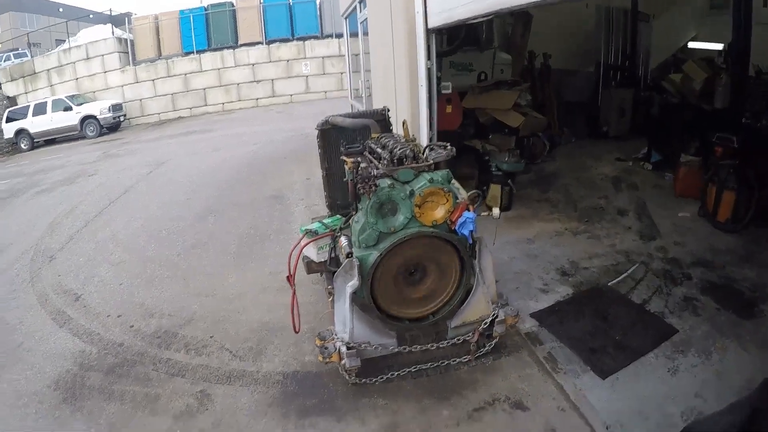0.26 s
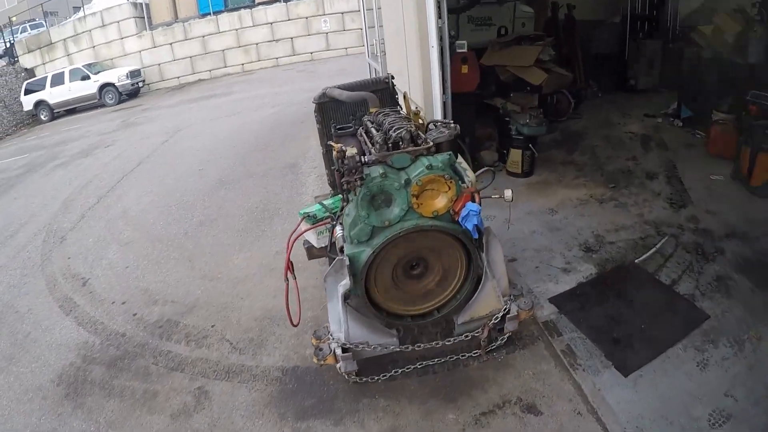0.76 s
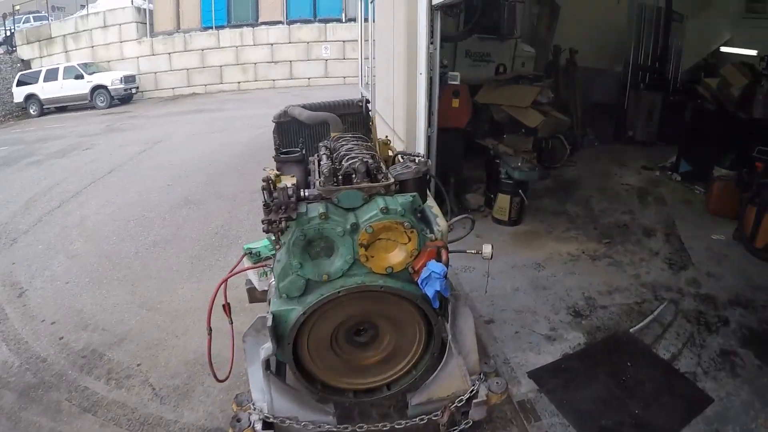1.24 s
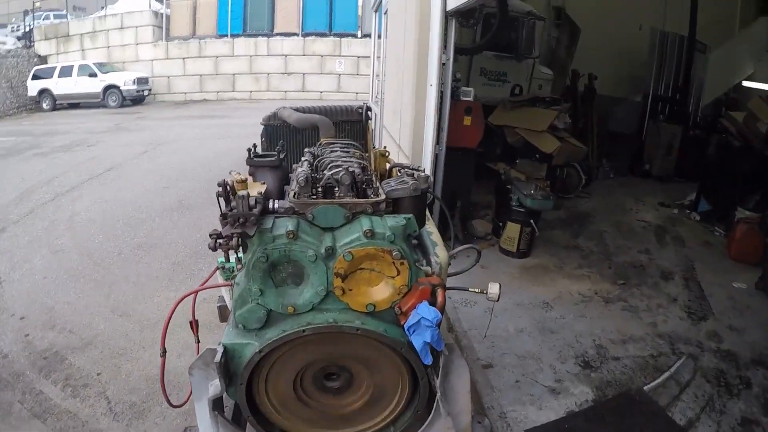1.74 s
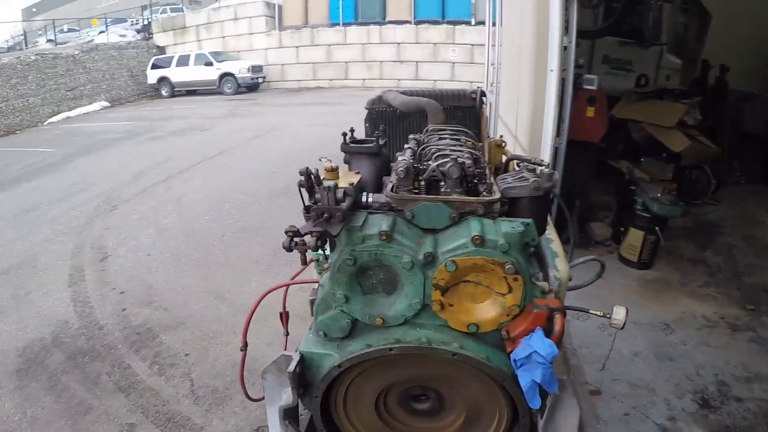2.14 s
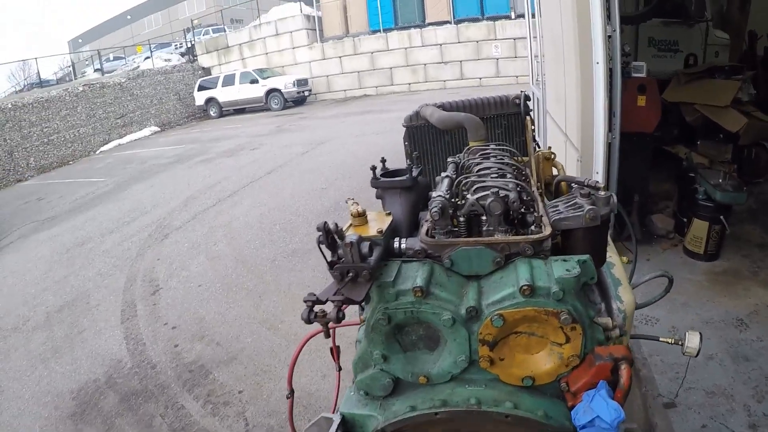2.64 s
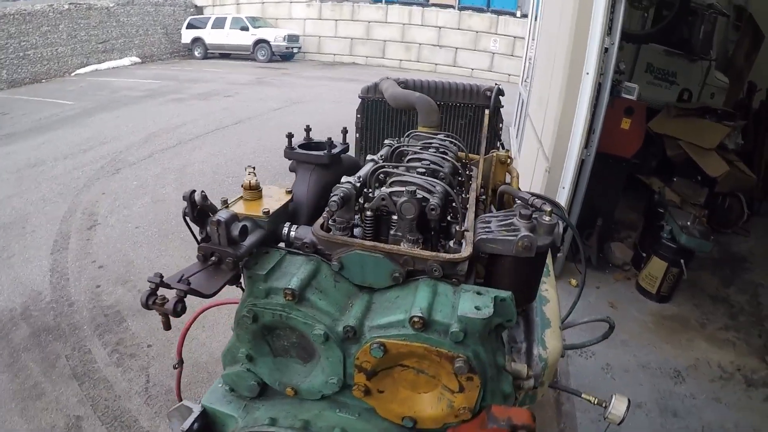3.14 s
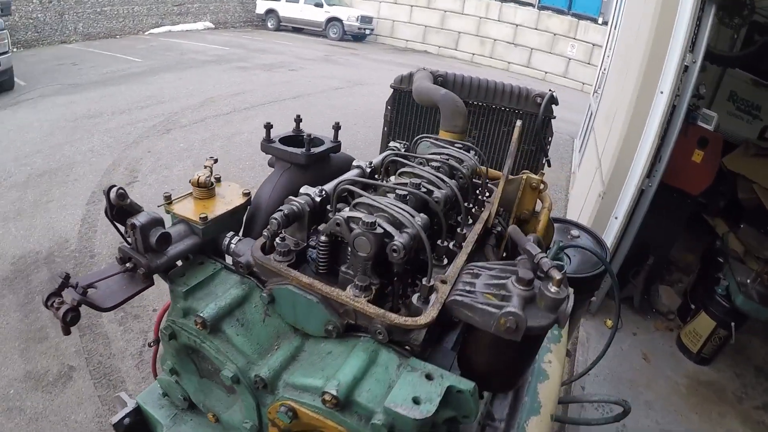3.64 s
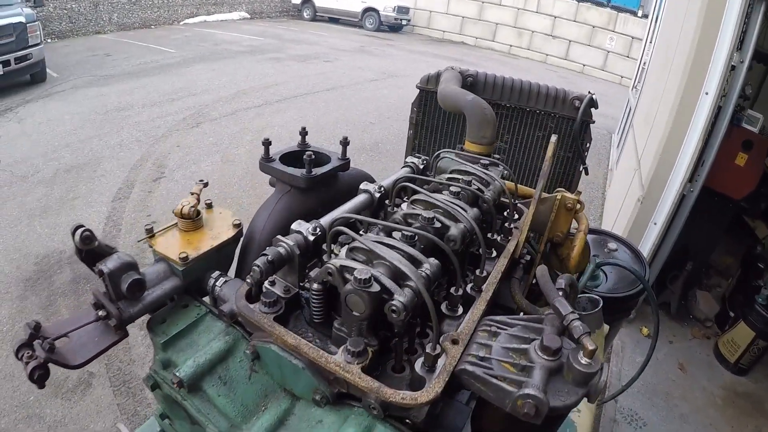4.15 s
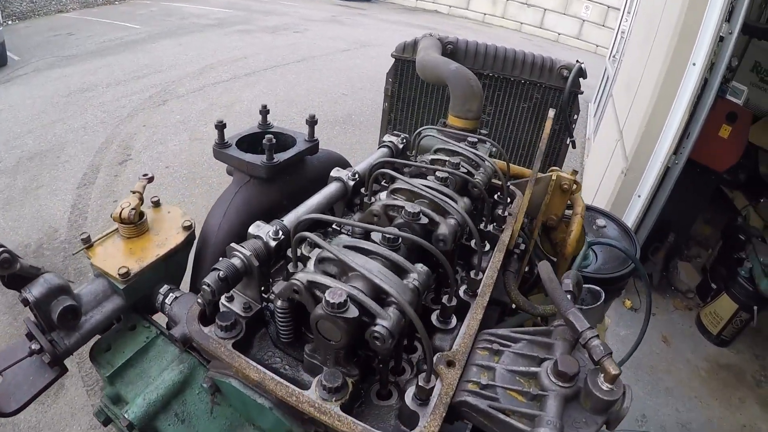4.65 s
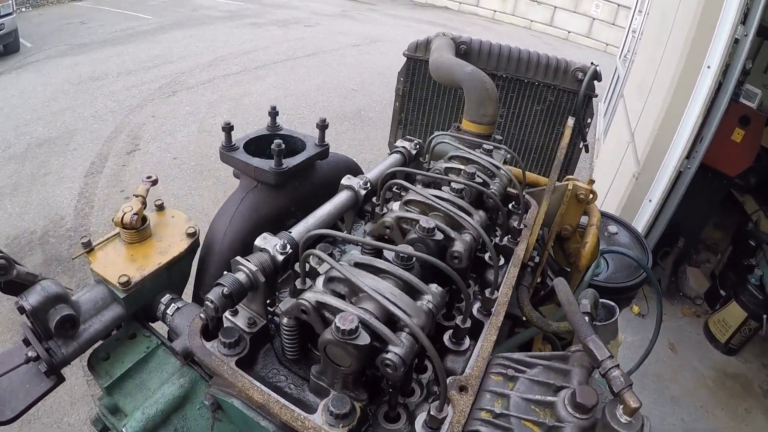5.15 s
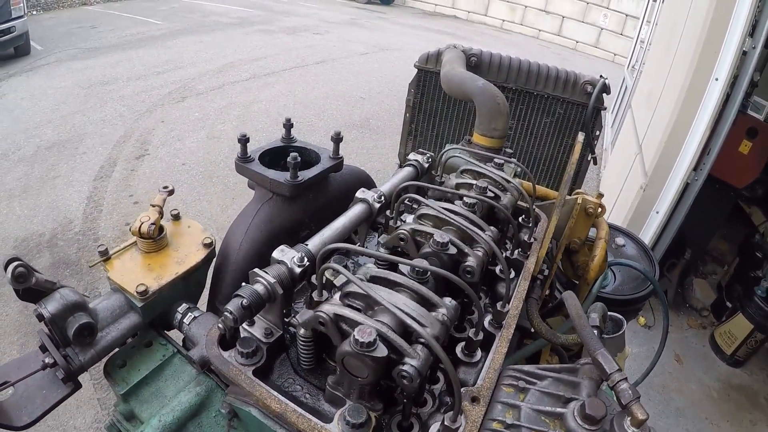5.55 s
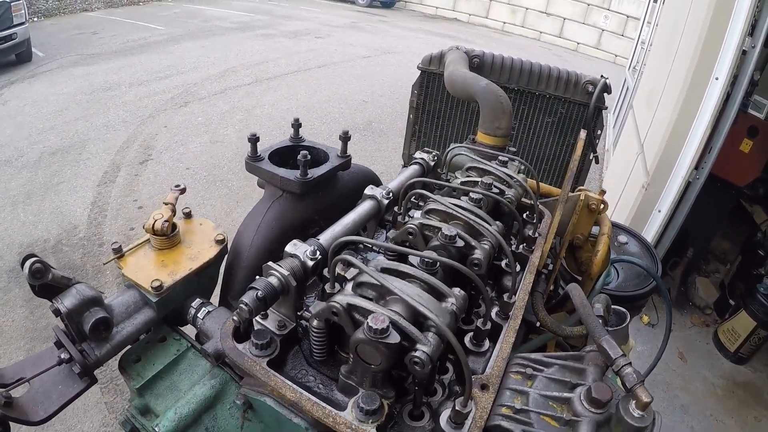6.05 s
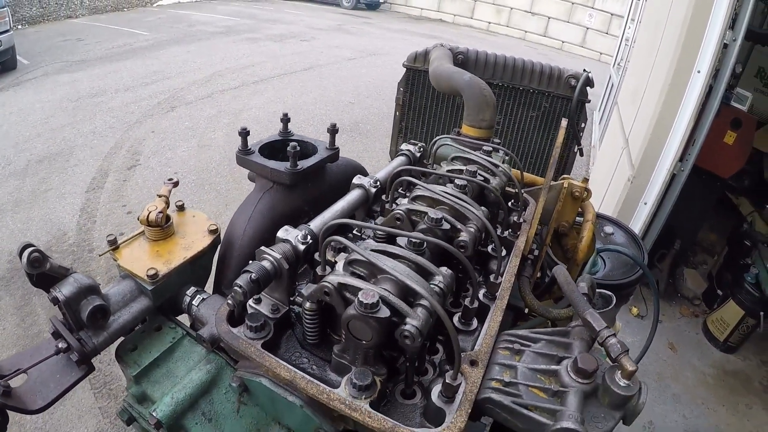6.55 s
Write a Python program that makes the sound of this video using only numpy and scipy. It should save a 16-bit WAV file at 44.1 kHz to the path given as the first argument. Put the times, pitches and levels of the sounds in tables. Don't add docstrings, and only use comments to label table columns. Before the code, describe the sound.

A bare two-stroke diesel is already idling at the start, about thirty blasts a second from an open exhaust stack. Valves snap, the block rings, rockers chatter and gas spits. A loose part clanks once per turn. The listener walks up over two seconds, then round to the stack side; slap from the shop front fades as direct sound takes over. Close small stereo microphones, slightly overloaded.

```python
import sys
import numpy as np
from scipy import signal
from scipy.fft import rfft, irfft
from scipy.io import wavfile
from scipy.ndimage import uniform_filter1d

SR = 44100
rng = np.random.default_rng(int(sys.argv[2]) if len(sys.argv) > 2 else 0)


def inscribe(sig):
    pcm = np.round(np.clip(np.atleast_2d(sig).T, -1, 1) * 32767)
    wavfile.write(sys.argv[1], SR, pcm.astype(np.int16))


def gain_from_db(level_db):
    decades = np.asarray(level_db, float) / 20
    return 10 ** decades


N = 299880
LEAD = SR // 5
TIME_S = np.arange(N) / SR


def band(x, hz, width):
    return signal.lfilter(*signal.iirpeak(hz, hz / abs(width), fs=SR), x)


def pole(x, hz, kind):
    b, a = signal.butter(N=1, Wn=hz, btype=kind, fs=SR)
    return signal.lfilter(b, a, signal.lfilter(b, a, x))


def clicks(s, size):
    at = np.clip(s * SR + LEAD, 0, N + LEAD)
    whole = at.astype(int)
    part = at - whole
    room = N + LEAD + 2
    first = np.bincount(whole, size * (1 - part), room)
    second = np.bincount(whole + 1, size * part, room)
    return (first + second)[:N + LEAD]


def puff(x, rise_ms, fall_ms):
    rise = np.exp(-1000 / (SR * max(rise_ms, .05)))
    fall = np.exp(-1000 / (SR * fall_ms))
    falling = signal.lfilter([1], [1, -fall], x)
    return signal.lfilter([1 - rise], [1, -rise], falling)[LEAD:]


def curve(table, s):
    return [np.interp(s, np.array(table)[:, 0], column) for column in np.array(table).T[1:]]


# time in seconds, way still to go (0 to 1),
# way round the housing to the stack side (0 to 1).
WALK = [
    (0, 0.7, 0.19),
    (.6, 0.59, 0),
    (1.2, 0.51, 0.27),
    (1.9, 0.03, 0),
    (2.6, 0.18, 0.1),
    (3.1, 0.04, 0.36),
    (3.6, 0, 0.68),
    (4.6, 0.1, 0.9),
    (6.8, 0.04, 1),
]


def heard(rule, s):
    far, side = curve(WALK, s)
    return rule[0] + rule[1] * far + rule[2] * side


def echoed(at, size, s):
    delay_ms = heard((2.14, 1.93, 0.056), s)
    echo_db = heard((-27.5, 32.5, -23), s)
    return clicks(at, size) + clicks(at + delay_ms / 1000, size * gain_from_db(echo_db))


# time in seconds, firings per second.
SPEED = [(0.0, 29.492), (0.23, 30.036), (0.88, 30.861), (1.28, 30.48), (1.77, 30.261), (2.19, 30.471),
         (3.04, 30.733), (3.36, 30.131), (3.7, 30.368), (3.9, 30.915), (4.38, 30.863), (4.55, 30.218),
         (5.3, 29.936), (5.73, 30.84), (6.16, 30.548), (6.8, 30.622)]


def firings():
    first_firing_s = .0273
    t = np.arange(-LEAD, N + LEAD) / SR
    done = np.cumsum(curve(SPEED, t)[0]) / SR
    done = done - np.interp(first_firing_s, t, done)
    number = np.arange(np.ceil(done[0]), done[-1])
    return np.interp(number, done, t), (number % 3).astype(int)


# pitch in Hz, likeness of left and right (0 to 1),
# left minus right in dB.
PORTS = [(60, 0.93, 29.5), (297, 1, 12), (670, 0.61, -3), (1310, 0, 1.5), (3550, 1, 0.7),
         (5330, 0.76, -1.5), (7560, 0.59, 2), (8700, 0.05, -10), (12000, 0.2, -5.5), (16000, 0.3, -7)]
# pitch in Hz, how far the left microphone leads in radians.
PORT_PHASE = [(20, 0), (4820, 0), (7100, .5), (8010, -1), (8870, -5), (10700, -4.5), (14000, -4.5),
              (15500, 0)]


def hiss(colour, grit_db=0., grit_ms=0.22):
    pitch = np.log(np.arange(N // 2 + 1) * SR / N + 1)
    ports, phase, colour = np.array(PORTS), np.array(PORT_PHASE), np.array(colour)
    alike = np.clip(np.interp(pitch, np.log(ports[:, 0]), ports[:, 1]), 0, 1)
    pan_db = np.interp(pitch, np.log(ports[:, 0]), ports[:, 2])
    lead = np.interp(pitch, np.log(phase[:, 0]), phase[:, 1])
    grit = uniform_filter1d(rng.standard_normal(N), int(grit_ms * SR / 1000) + 1)
    mid, side = rfft(rng.standard_normal((2, N)) * gain_from_db(grit_db * grit / grit.std()))
    mid = mid * np.sqrt(1 + alike)
    side = side * np.sqrt(1 - alike)
    lean = gain_from_db(pan_db / 2) * np.exp(.5j * lead)
    gain = gain_from_db(np.interp(pitch, np.log(colour[:, 0]), colour[:, 1], left=-120, right=-120))
    out = irfft(gain * np.array([(mid + side) * lean, (mid - side) / lean]), N)
    return out / np.sqrt(np.mean(out.mean(axis=0) ** 2))


# pitch in Hz, strength in dB per Hz.
YARD_COLOUR = [(20, -35), (40, -12.5), (120, -7.5), (300, -5), (600, -4.5), (2000, -15), (5000, -55),
               (7000, -17.5), (10000, -29.5), (15500, -48)]


def yard():
    level_db = -28 + heard((2.5, -3, -6), TIME_S)
    return gain_from_db(level_db) * hiss(YARD_COLOUR)


# blast in dB, snap in dB, gas in dB, gas lag in ms,
# gas rise time in ms, rattle in dB.
CYLINDERS = [
    (0.5, 7.5, 2.1, -0.19, 1.9, 5.5),
    (0.33, 15, 4.5, -0.32, 3.26, 6.5),
    (-0.63, 3, 2, 0.029, 3.7, 3),
]
# pitch in Hz, width in Hz, level in dB for a blow from cylinder 1, 2, 3.
BLOCK = [(330.7, 11, 10, 21, 15), (479, 59, 27, 12, 3.5), (686, 26, 17, 7.4, 20.7),
         (762, 99, -18, 4.2, 19.2), (1047, 110, 12, 9.6, 2), (597, 31.7, 24.5, 27.9, 15),
         (948, 28.6, 22, 31, 18)]
# pitch in Hz, width in Hz, level in dB under cylinder 1, 2, 3.
ROCKERS = [(1890, 1080, -11.5, -13, -18), (2004, 27, -1, -8, -2), (2630, 29.5, -3.5, -0.5, -15),
           (3126, 39, -4, -2, -7), (3440, 58, -6, -5.5, -4), (4133, 52, -4, -2, -7.5),
           (4610, 174, -10, -39.5, -35)]


def valves(s, cylinder):
    snap_hz, snap_width_hz = 582, 407
    shadow_hz = 577
    rocker_lag_ms = np.array((0, .5, 2.14))
    chance = rng.standard_normal((len(s), 3)).T
    at = s - .001 + .0001 * chance[0]
    walk_db = heard((-0.5, -9, 2.5), s)
    blow_db = 1.0 * chance[2]

    snap_db = np.array(CYLINDERS)[cylinder, 1] + 0.52 * walk_db + .5 * chance[1]
    snap = band(clicks(at, gain_from_db(snap_db)), snap_hz, snap_width_hz)
    snap = band(snap, snap_hz, 2 * snap_width_hz)

    block = 0
    for hz, width, *db in BLOCK:
        ring_db = blow_db + walk_db * min(shadow_hz / hz, 1) ** 2 + np.array(db)[cylinder]
        block = block + band(clicks(at, gain_from_db(ring_db)), hz, width)

    lift = s + rocker_lag_ms[cylinder] / 1000
    loose_db = 1.3 * rng.standard_normal((len(s), len(ROCKERS))).T
    rockers = 0
    for (hz, width, *db), loose in zip(ROCKERS, loose_db):
        hits = clicks(lift, gain_from_db(np.array(db)[cylinder] + 4.0 + loose))
        chatter = puff(hits, 0.77, 1.81) * rng.standard_normal(N)
        rockers = rockers + band(chatter, hz, width)

    knock = block + gain_from_db(-31.5 + 27.5) * snap
    return rockers - gain_from_db(1.5) * pole(knock, 1070, "low")[LEAD:]


def exhaust(s, cylinder):
    chance = rng.standard_normal((len(s), 4)).T
    extra_ms = heard((0.36, -0.46, 0.085), s)
    blast_db = heard((1, -3.5, 0), s) + np.array(CYLINDERS)[cylinder, 0] + 0.13 * chance[1]
    return_db = heard((-3, -5, -0.5), s) + 0.097 * chance[2]
    ring_db = heard((2.5, 0, 0.2), s) + 0.39 * chance[3]
    third_db = (cylinder == 2) * heard((1.5, 1, -2), s)
    shop_db = heard((-12, 20, -8.5), s) + 1.2 * chance[3]
    boom_db = heard((-25, 8.5, -2), s) - 12.0
    s = s + .00008 * chance[0]
    fuel_db = 2 * (30.47 - curve(SPEED, s)[0])
    unit = SR / 30.5

    blast = echoed(s - 0.51 / 1000, unit * gain_from_db(blast_db), s)
    back = echoed(s + (6.335 + extra_ms) / 1000, unit * gain_from_db(return_db), s)
    ring = echoed(s + (0.11 + extra_ms) / 1000, unit * gain_from_db(ring_db + fuel_db + third_db), s)
    shop = clicks(s + 8.48 / 1000, unit * gain_from_db(shop_db))
    boom = clicks(s + 0.0058, unit * gain_from_db(boom_db))

    pressure = band(blast, 189.65, 18.75) + band(back, 182.5, 35.3)
    pressure = pressure - band(ring, 246.1, 13.3) - band(shop, 251.4, 14.5)
    pressure = pole(pole(pressure, 75.7, "low"), 50.5, "high")
    pressure = pressure + pole(band(boom, 103, 100), 250, "low")
    return pressure[LEAD:]


# pitch in Hz, strength in dB per Hz.
JET = [(2350, -71), (4000, -15), (4810, -8.5), (5330, -9.5), (6480, 0.5), (7220, 1.5), (7650, 0),
       (8630, -10.5), (10400, -11.5), (11500, -18), (13800, -19), (15100, -24), (15800, -34)]
# pitch in Hz, strength in dB per Hz.
RATTLE = [(300, -39), (450, -14), (870, -12.5), (1300, -16), (1750, -15), (2000, -12), (2400, -14),
          (3300, -12), (4000, -10.5), (5000, -19.5), (7000, -11)]


def gas(s, cylinder):
    jet_rule, rattle_rule = (-24.5, -5.5, 1.3), (-25, -8, -1.5)
    jet_db, rattle_db = heard(jet_rule, s), heard(rattle_rule, s)
    wall_db = heard((-15, 14, -7), s)
    arrival_ms = heard((-.4, -0.83, 0.17), s)
    chance = rng.standard_normal((len(s), 3)).T
    jet = rattle = 0
    for k, (_, _, gas_db, lag_ms, rise_ms, shake_db) in enumerate(CYLINDERS):
        mine = cylinder == k
        at = s + (lag_ms + arrival_ms) / 1000 + 0.00053 * chance[0]
        size = mine * gain_from_db(jet_db + gas_db + 1.57 * chance[1])
        jet = jet + puff(clicks(at, size), rise_ms, 2.99)
        jet = jet + puff(clicks(at + 0.01, size * gain_from_db(wall_db - 4.5)), 1.65, 3.23)
        size = mine * gain_from_db(rattle_db + shake_db + 3.5 * chance[2])
        rattle = rattle + puff(clicks(at - .0005, size), rise_ms, 3.3)
        rattle = rattle + puff(clicks(at + 0.017, size * gain_from_db(wall_db)), 9.6, 7.6)

    jet = gain_from_db(11.0) * jet + gain_from_db(-30) * gain_from_db(heard(jet_rule, TIME_S))
    rattle = gain_from_db(2.0) * rattle + gain_from_db(-14) * gain_from_db(heard(rattle_rule, TIME_S))
    jet = jet * hiss(JET, grit_db=-1.0)
    sizzle_db = heard((4, 4.5, -14), TIME_S)
    jet = jet + (gain_from_db(sizzle_db) - 1) * pole(jet, 5600, "high")
    return jet + rattle * hiss(RATTLE, grit_db=-4.5)


# pitch in Hz, width in Hz, level in dB.
THUD = [(402, 28, 25), (450, 32, 24)]
# pitch in Hz, width in Hz, level in dB.
TICK = [(1110, 60, 7), (1290, 40, 8), (1450, 60, 5), (1555, 28, 13), (1634, 40, 14)]


def clank(s):
    chance = rng.standard_normal((len(s), 4)).T
    at = s + .007 + 0.00023 * chance[0]
    thud_db = heard((3.5, -0.5, -11.5), s) + 0.43 * chance[1]
    tick_db = heard((6.5, 1, -6), s)
    tilt_db = heard((5, -13, -6), s) / 2

    strike = clicks(at, gain_from_db(tick_db - 1 + 2.6 * chance[2]))
    bounce = clicks(at + 0.004035 + 0.00049 * chance[3], gain_from_db(tick_db - 5.0))
    first_touch = clicks(at - .009, gain_from_db(tick_db - 4.0))
    tick = strike + bounce + first_touch

    thud = 0
    for way, lag_ms, (hz, width, db) in zip((1, -1), (54, 0), THUD):
        blow = clicks(at + lag_ms / 1000, gain_from_db(thud_db + db + way * tilt_db))
        thud = thud + band(blow, hz, width)
    thud = gain_from_db(8.0) * pole(thud, 670, "low")
    ticks = sum(gain_from_db(db) * band(tick, hz, width) for hz, width, db in TICK)
    return (thud + ticks)[LEAD:]


def scene():
    s, cylinder = firings()
    pan_db = heard((3, 1, 1.4), TIME_S)
    sides = np.array([[1], [-1]])
    metal = valves(s, cylinder) * gain_from_db(sides * (pan_db - 3.0) / 2)
    lows = exhaust(s, cylinder) * gain_from_db(sides * pan_db / 2)
    loose_part = clank(s[cylinder == 0]) * gain_from_db(sides * -1.1)
    return yard() + metal + lows + gas(s, cylinder) + loose_part


def top_cut(x):
    return signal.sosfilt(signal.butter(12, 15500, fs=SR, output="sos"), x)


def record(dry):
    mix = np.tanh(0.83 * dry) / 0.81
    return top_cut(mix)


dry = scene()
out = record(dry)
inscribe(out)
```